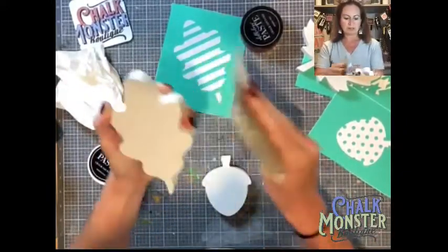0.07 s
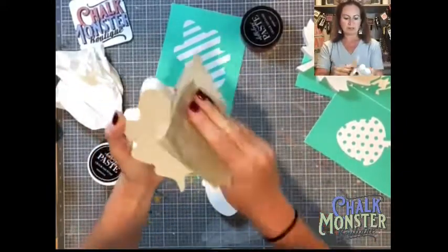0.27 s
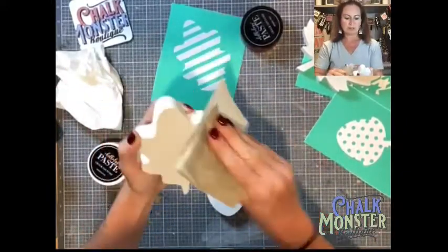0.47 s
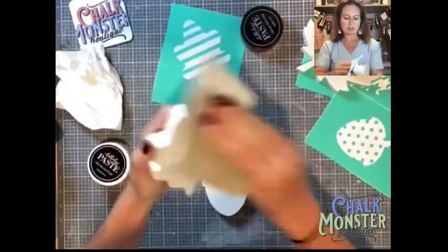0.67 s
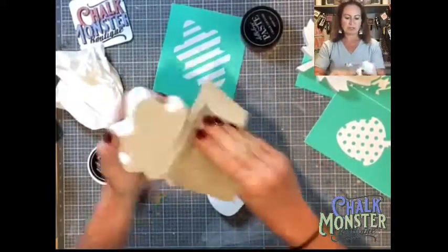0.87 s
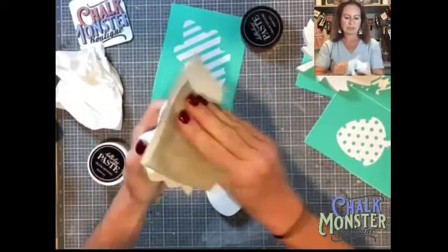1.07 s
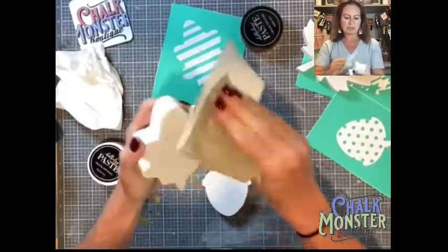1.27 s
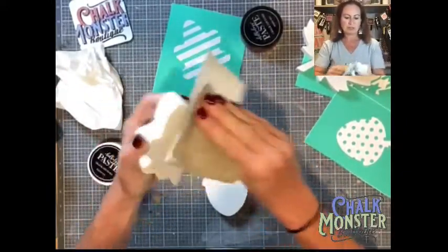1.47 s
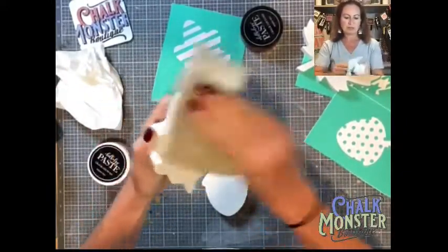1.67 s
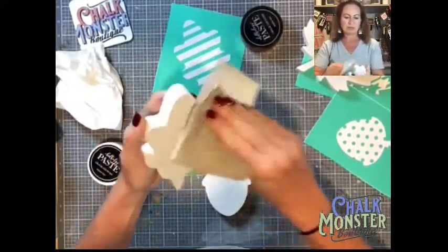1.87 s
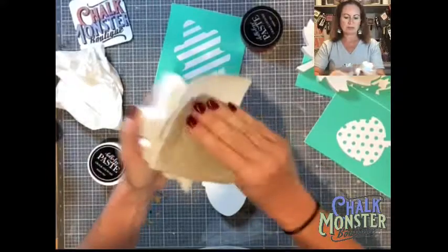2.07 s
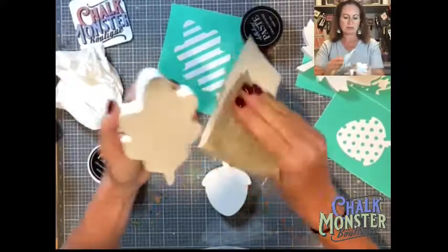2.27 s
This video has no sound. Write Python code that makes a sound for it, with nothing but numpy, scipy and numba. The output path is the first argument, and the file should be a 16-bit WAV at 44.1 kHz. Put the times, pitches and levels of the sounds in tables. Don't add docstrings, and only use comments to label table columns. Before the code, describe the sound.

Sandpaper rubs a thin wooden cutout, close up in a small room with faint hum. A previous stroke fades at the start; a light slap at 0.27 s leads to two faint scrapes near 0.45 and 0.55. Firm cracks at 0.76, 1.11, 1.43, 1.73 and 2.06 each knock the board and start a gritty rasp, strongest around 0.9; the last ones stumble unevenly, ending near 2.3.

```python
import sys
import numpy as np
from scipy import signal
from scipy.fft import rfft, irfft
from scipy.io import wavfile
from scipy.ndimage import uniform_filter1d
from numba import njit

SR = 44100
rng = np.random.default_rng(int(sys.argv[2]) if len(sys.argv) > 2 else 0)


def invert_db(level):
    return 10 ** (np.asarray(level, dtype=float) / 20)


def generate_wav(signal):
    frames = np.transpose(np.atleast_2d(signal))
    scaled = np.clip(frames, -1, 1) * 32767
    pcm = np.round(scaled).astype(np.int16)
    wavfile.write(sys.argv[1], SR, pcm)


N = 102576
LEAD_S = 0.25
M = N + int(LEAD_S * SR)
T = np.arange(M) / SR - LEAD_S

# time in seconds, pressure in dB, wood against paper in dB.
LIGHT_DRAGS = [
    [(.385, -70, -5), (.397, -66.5, 17), (.425, -51.5, 1), (.47, -48.5, -1.5), (.495, -58, 7),
     (.51, -76, 7)],
    [(.525, -52, -1), (.542, -48.5, 7), (.563, -40.5, 1), (.585, -51.5, 5), (.61, -62, 10)],
]
# time in seconds, pressure in dB, wood against paper
# in dB.
FIRM_DRAGS = [
    [(.79, -68, -6), (.818, -40, -0.5), (.84, -37, 1.5), (.857, -32.5, 1.5), (.885, -34.5, -1.5),
     (.91, -29.5, -2.5), (.93, -36.5, 5), (.97, -58, -10)],
    [(1.145, -58, -8), (1.165, -45.5, 2), (1.195, -44, 3.5), (1.204, -36.5, 6), (1.228, -38, 6),
     (1.24, -44, 3.5), (1.27, -49.5, 8), (1.3, -58, -15)],
    [(1.468, -68, -14), (1.476, -48.5, -5), (1.495, -40.5, -11.5), (1.518, -33, 7), (1.53, -39.5, 4),
     (1.555, -53, 4), (1.585, -45, 7.5), (1.62, -71, 24)],
]
# time in seconds, pressure in dB, wood against paper in dB.
BUMPY_DRAGS = [
    [(1.778, -55, -27), (1.79, -52, -16.5), (1.805, -41, -5), (1.822, -44.5, 0), (1.835, -35, 1.5),
     (1.87, -41.5, 1.5), (1.91, -64, 3), (1.935, -48, 5.5), (1.96, -59, -4)],
    [(2.065, -50, 5), (2.09, -43, 6), (2.115, -37.5, 2), (2.15, -40.5, -5), (2.18, -38.5, 3),
     (2.21, -39.5, -3), (2.235, -42, 10), (2.25, -51, 7), (2.3, -70, 8)],
]
DRAGS = LIGHT_DRAGS + FIRM_DRAGS + BUMPY_DRAGS
# time in seconds, pressure in dB, wood against paper in dB.
EARLIER_DRAG = [(-.2, -50, 5.8), (-.06, -42.5, 15), (-.03, -59.5, 8), (.08, -66, 10.2), (.25, -73, 6.6)]
# board boom in dB, sheet sizzle in dB,
# board pitch as a ratio, free sheet pitch as a ratio.
GRIPS = [(2.5, -21, 1.14, 0.99), (3, 3.5, 0.473, 0.98), (-6, -2.5, 0.967, 0.58), (-3.5, -1, 1.046, 0.965),
         (-3, 2, 1.07, 1.034), (-2, 3, .98, 1.015), (-1.5, 0.5, 1.037, 1.03), (-2.5, 1, 1.134, 0.995)]

# centre in Hz, width in Hz, level in dB.
PAPER = [(4790, 620, 2), (5550, 440, 2), (6660, 1400, -3), (3650, 320, 0.5)]
# centre in Hz, width in Hz, level in dB.
SIZZLE = [(8350, 570, -2), (10100, 2300, 6.5), (14800, 3100, 1)]
# centre in Hz, width in Hz, level in dB.
WOOD = [(1270, 1090, -5), (1765, 430, 0), (2298, 297, -0.5), (2954, 560, -1.5), (3525, 506, -1),
        (4800, 2640, -8)]
# centre in Hz, width in Hz, level in dB.
BOARD = [(225, 560, -12), (437, 102, -3), (751, 71.6, -5), (1230, 388, -3)]

# start in seconds, crack in dB, thump in dB, rattle in dB, upper ring in dB.
LANDINGS = [(0.2709, -44, -13.5, 5, 4), (0.7568, -35, 1, 5.5, -2), (1.1070, -28.5, -8.5, 0.5, -15),
            (1.4341, -34, -10, 7, -4.5), (1.44, -41, -6.5, -21, -11), (1.451, -52.5, -1, -17, -11),
            (1.7288, -31, -12, 0, -13.5), (2.0621, -39, -7, 0, 0)]
# pitch in Hz, level in dB, 60 dB decay in seconds.
KNOCK = [(169, -8, 0.03), (255, 4, 0.035), (340, -10, 0.03), (490, -5, 0.03), (720, -6, 0.025),
         (1180, -4, 0.015), (1400, 0, 0.012), (1780, 4, 0.012), (2280, 0, 0.012)]

# start in seconds, body in dB, crisp tick against the body in dB.
SNAGS = [(0.156, -85, 10), (0.37, -68, 1), (0.394, -64, -6), (0.406, -63, 6), (.812, -60, 0),
         (0.835, -45, 14), (0.907, -29.5, -2), (1.161, -68, 26), (1.203, -35, -15), (1.472, -39.5, -12),
         (1.518, -36, 9), (1.751, -64, 4), (1.785, -57, 8), (1.831, -45, 15.5), (1.934, -40.5, -19),
         (2.078, -61, -3), (2.112, -62, -6), (2.119, -53, 5), (2.187, -40, 4.5)]
# start in seconds,
# level in dB.
SHARP_TICKS = [(.7571, -39), (1.2635, -43), (1.2665, -48), (1.272, -49), (1.7858, -42), (1.9332, -44)]
# start in seconds, level in dB, pitch in Hz, length in seconds.
CHATTERS = [(.2705, -49, 1850, 0.0051), (.271, -51, 419, 0.0068), (.282, -55, 2120, .012),
            (0.443, -58.5, 1170, .015), (0.472, -57, 1150, 0.0092), (1.207, -47, 782, .012),
            (1.492, -46, 3700, 0.01), (0.918, -42, 3040, .008), (0.393, -59, 3170, .004),
            (0.4, -59, 5000, .004), (.757, -41.5, 510, 0.0056), (1.436, -52, 239.5, 0.0085),
            (1.73, -45, 2300, 0.0051), (1.731, -50.5, 1690, 0.01), (0.416, -54.5, 3970, 0.0071),
            (0.43, -50, 3970, 0.0046), (0.441, -48.5, 4300, 0.0075), (0.434, -54.5, 1810, 0.013),
            (0.46, -54, 5560, 0.0055), (0.542, -50, 2550, 0.0057), (0.554, -47.5, 1710, 0.013),
            (0.557, -48, 3470, 0.0058), (0.559, -45, 680, 0.0079), (0.568, -44, 2250, 0.0035),
            (0.565, -48.5, 1053, 0.014), (0.585, -51, 2200, 0.0032), (0.585, -56, 2220, 0.003),
            (.811, -44, 4840, 0.0045), (.856, -37, 2950, 0.0069), (.866, -36, 2190, 0.0046),
            (0.874, -36.5, 1130, .006), (0.886, -34, 2440, 0.0066), (1.114, -58, 1210, 0.004),
            (1.115, -48.5, 472, 0.0066), (1.505, -47.5, 760, .014), (1.855, -45, 810, 0.005),
            (2.077, -47.5, 1360, .01), (2.11, -33.5, 4430, .004), (2.115, -38, 4130, .004),
            (2.127, -44, 3970, .003), (2.17, -36, 5660, 0.0037), (2.18, -41, 4950, .003),
            (2.209, -41, 3070, .005), (2.22, -51, 1820, 0.0076)]

# frequency in Hz, 60 dB decay in seconds.
ROOM_T60 = [(200, 0.22), (1000, 0.47), (3500, 0.38), (8000, 0.34), (15000, 0.18)]
# frequency in Hz, level in dB per Hz.
AIR = [(71, 6), (120, -16), (256, -22.5), (592, -27), (1400, -23.5), (2240, -26.5), (3050, -34),
       (6630, -56.5), (16000, -65)]
# centre in Hz, width in Hz, level in dB.
HUM = [(30, 12, -90), (48.6, 30, -62.5), (89.6, 8.2, -61), (142, 32, -96.5)]


def level(x, db):
    return x * invert_db(db) / np.sqrt(np.mean(x ** 2))


@njit
def svf(x, hz, width):
    y, b, l = np.empty(len(x)), 0., 0.
    for i in range(len(x)):
        g, k = np.tan(np.pi * hz[i] / SR), width / hz[i]
        v = (b + g * (x[i] - l)) / (1 + g * (g + k))
        b, l, y[i] = 2 * v - b, l + 2 * g * v, k * v
    return y


def noise_band(hz, width):
    return svf(rng.standard_normal(M), np.full(M, float(hz)), float(width))


def walk(rate):
    hold = int(SR / rate)
    steps = np.repeat(rng.standard_normal(2000), hold)[:M]
    return 0.53 * uniform_filter1d(uniform_filter1d(steps, hold), hold)


def bursts(events, db, rise_s, fall_s):
    env = np.zeros(M)
    for start, d in zip(events, db):
        i = np.searchsorted(T, start)
        age = T[i:i + SR // 4] - start
        env[i:i + SR // 4] += invert_db(d) * (1 - np.exp(-age / rise_s)) * np.exp(-age / fall_s)
    return env


def grit():
    grains_per_s, spread_db, biggest_grain = 14000, 2.2, 0.004
    catch, size, sign = rng.random((3, M))
    strength = invert_db(-spread_db * np.log(size + biggest_grain))
    clicks = (catch < grains_per_s / SR) * strength * np.sign(sign - 0.5)
    judder = invert_db(1.8 * np.clip(walk(170), -3, 1.5))
    return level(clicks, 0) * judder


def body(x, peaks, ratio=1):
    wander, patchy_db = 0.02, 0.8
    out = np.zeros(M)
    for k, (hz, width, db) in enumerate(peaks):
        swell = invert_db(db + patchy_db * walk(39.38))
        centre = np.clip(hz * ratio * (1 + wander * walk(25.63)), 20, 0.44 * SR)
        out += (-1) ** k * swell * svf(x, centre, float(width))
    return level(out, -3)


def drags(paper, sizzle, wood, board):
    out = np.zeros(M)
    for rows, (boom_db, sizzle_db, _, _) in zip([EARLIER_DRAG] + DRAGS, GRIPS):
        s, db, tilt = np.array(rows, float).T
        edge = np.clip(np.minimum(T - s[0], s[-1] - T) / 0.008, 0, 1)
        pressure = invert_db(np.interp(T, s, db) - 1.5)
        lean = np.interp(T, s, tilt) / 2
        sheet = paper + invert_db(sizzle_db - 6) * sizzle
        plank = wood + invert_db(boom_db - 5) * board
        out += edge * pressure * (invert_db(-lean) * sheet + invert_db(lean) * plank)
    return out


def knocks():
    s, db, thump, _, ring = np.array(LANDINGS, float).T
    chance = rng.standard_normal((len(s), len(KNOCK), 2))
    out, span = np.zeros(M), SR // 8
    for e in range(len(s)):
        i = np.searchsorted(T, s[e])
        age = T[i:i + span] - s[e]
        for (hz, mode_db, t60), (a, b) in zip(KNOCK, chance[e]):
            low = hz < 600
            lag_s, push_s = (0.003, 0.004) if low else (0, 0.0006)
            since = np.maximum(age - lag_s, 0)
            push = np.minimum(since / push_s, 1)
            gain = invert_db(db[e] + (thump[e] if low else ring[e]) + mode_db + 0.54 * a) * np.sign(b)
            tone = np.sin(2 * np.pi * hz * (1 + 0.05 * b) * since)
            out[i:i + span] += gain * push * tone * 1000. ** (-since / t60)
    return signal.sosfilt(signal.butter(4, 130, "high", fs=SR, output="sos"), out)


def landings(sheet, wood, board):
    s, db, thump, rattle, _ = np.array(LANDINGS, float).T
    crack = bursts(s, db - 2, 0.00003, 0.00015) * np.sign(rng.standard_normal(M))
    crisp_edge = bursts(s, db - 14, 0.0001, 0.001) * level(noise_band(15000, 3000), 0)
    slap_db, slap_s = db + 0.5, 0.00092
    touch = bursts(s, slap_db, 0.00024, slap_s)
    rebound = bursts(s + 0.002, slap_db - 2, 0.00032, slap_s)
    slap = (touch + rebound) * level(noise_band(3500, 3400), 0)
    rattle_db, rise_s, fall_s = -2.5, 0.012, 0.018
    loose = bursts(s, db + rattle + rattle_db, rise_s, fall_s) * (wood + invert_db(-22) * sheet)
    boom = bursts(s, db + thump + rattle_db + 5.5, rise_s, fall_s) * board
    return crack + crisp_edge + slap + loose + boom + knocks()


def snags(paper):
    s, db, tick = np.array(SNAGS, float).T
    crisp = level(noise_band(13500, 10000), 0)
    snaps = bursts(*np.array(SHARP_TICKS).T, 0.0001, 0.0007)
    ticks = bursts(s, db + tick, 0.00012, 0.001)
    return bursts(s, db + 3.5, 0.00031, 0.003) * paper + (ticks + snaps) * crisp


def chatter(grains):
    q, rise_s, gain_db = 6.7, 0.00092, 3
    out, span = np.zeros(M), SR // 16
    for s, db, hz, fall_s in CHATTERS:
        i = np.searchsorted(T, s)
        age = T[i:i + span] - s
        centre = np.full(2 * span, float(hz))
        once = svf(grains[i - span:i + span], centre, hz / q)
        ring = svf(once, centre, hz / q)[span:]
        shape = (1 - np.exp(-age / rise_s)) * np.exp(-age / fall_s)
        even = np.sqrt(np.sum(shape ** 2) / np.sum((ring * shape) ** 2))
        out[i:i + span] += invert_db(db + gain_db) * ring * shape * even
    return out


def room(x):
    room_db, gap_s = -12, 0.0033
    t = T[:SR // 2] + LEAD_S
    tail = np.zeros(len(t))
    f, t60 = np.array(ROOM_T60).T
    for hz in 125 * 2 ** np.arange(0, 7.1, 0.5):
        band = svf(rng.standard_normal(len(t)), hz + 0 * t, hz / 3.06)
        tail += band * 1000. ** (-t / np.interp(np.log(hz), np.log(f), t60))
    tail *= np.clip(t / gap_s - 0.5, 0, 1)
    return signal.fftconvolve(x, tail * invert_db(room_db) / np.sqrt(np.sum(tail ** 2)))[:M]


def background():
    f, db = np.array(AIR).T
    hz = np.arange(M // 2 + 1) * SR / M + 1
    colour = invert_db(np.interp(np.log(hz), np.log(f), db)) * (hz > 100)
    air = irfft(rfft(rng.standard_normal(M)) * colour, M)
    out = level(air, -64.5) * invert_db(0.53 * walk(10.0))
    for centre, width, hum_db in HUM:
        hum = svf(noise_band(centre, width), np.full(M, float(centre)), float(width))
        out += level(hum, hum_db)
    return out


def scene():
    starts = [rows[0][0] for rows in DRAGS]
    held = np.array(GRIPS)[np.searchsorted(starts, T), 2:]
    board_ratio, sheet_ratio = uniform_filter1d(held, size=400, axis=0).T
    fine, coarse, loose = grit(), grit(), grit()
    paper, sizzle = body(fine, PAPER, sheet_ratio), body(fine, SIZZLE)
    wood, board = body(coarse, WOOD), body(coarse, BOARD, board_ratio)
    dry = drags(paper, sizzle, wood, board)
    dry += landings(paper + sizzle, wood, board)
    dry += snags(paper) + chatter(loose)
    return (dry + room(dry) + background())[None, M - N:]


def top_cut(x):
    return signal.sosfilt(signal.butter(12, 16850, fs=SR, output="sos"), x)


def record(dry):
    low_pass = signal.ellip(8, 0.2, 32, 15800, fs=SR, output="sos")
    return top_cut(signal.sosfilt(low_pass, dry))


dry = scene()
out = record(dry)
generate_wav(out)
```